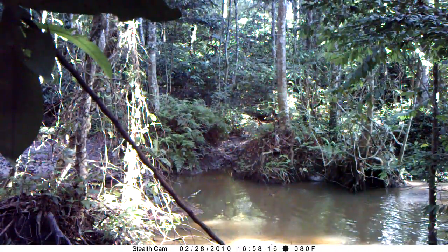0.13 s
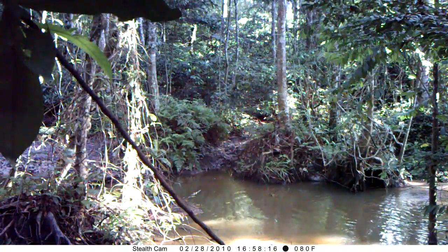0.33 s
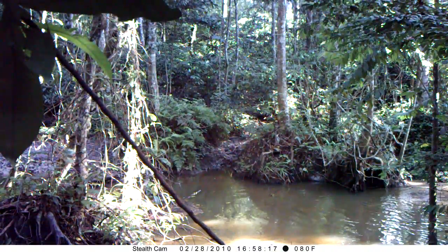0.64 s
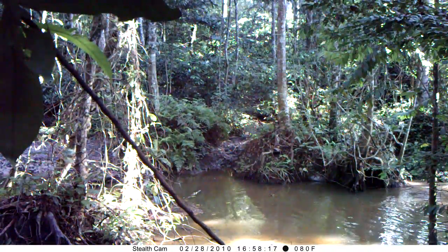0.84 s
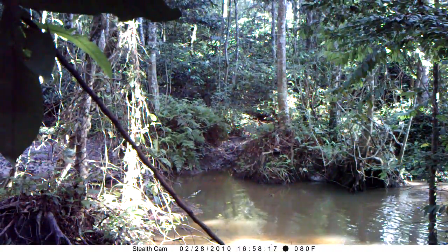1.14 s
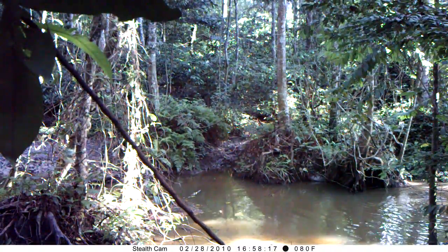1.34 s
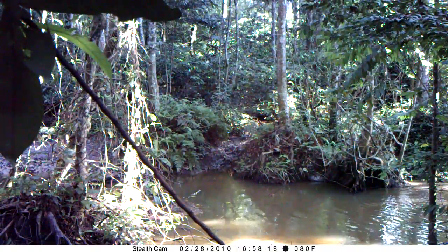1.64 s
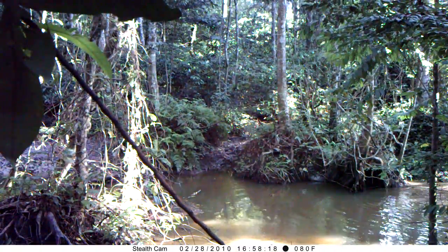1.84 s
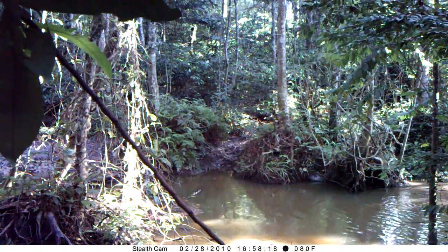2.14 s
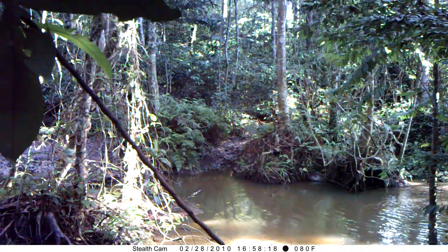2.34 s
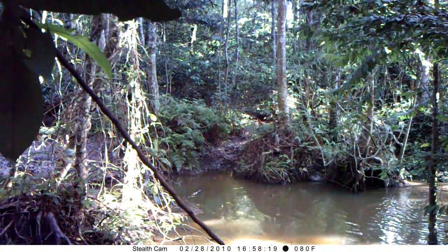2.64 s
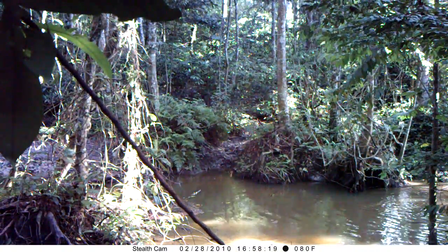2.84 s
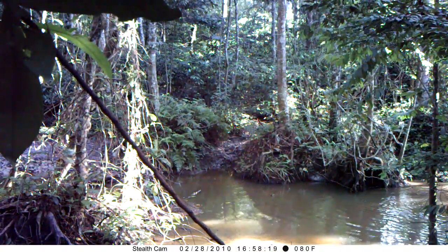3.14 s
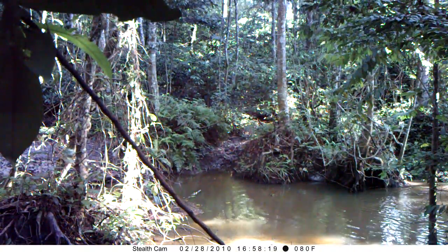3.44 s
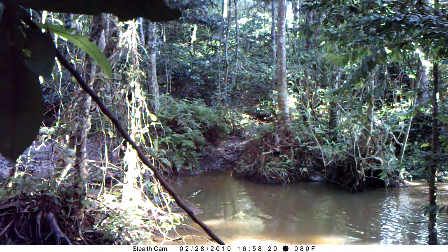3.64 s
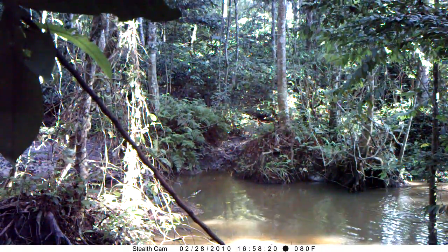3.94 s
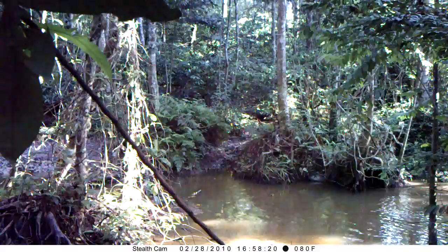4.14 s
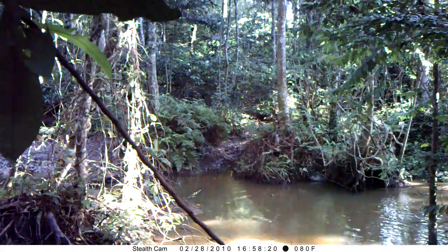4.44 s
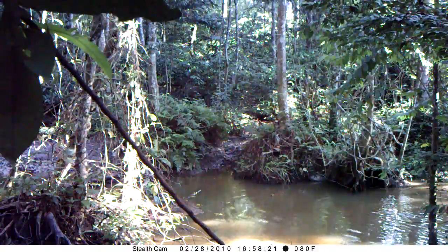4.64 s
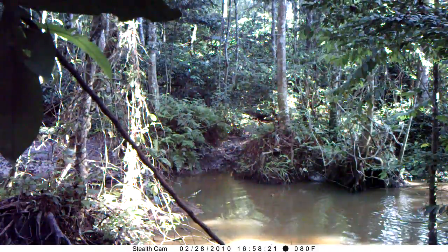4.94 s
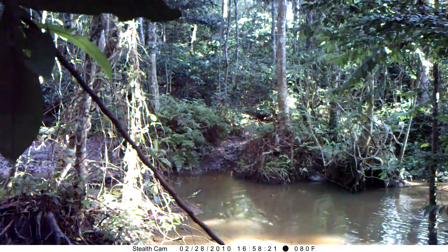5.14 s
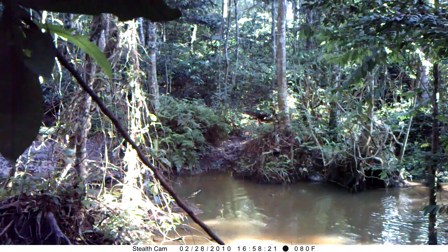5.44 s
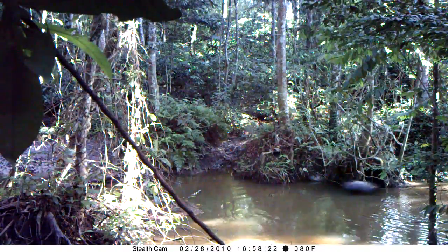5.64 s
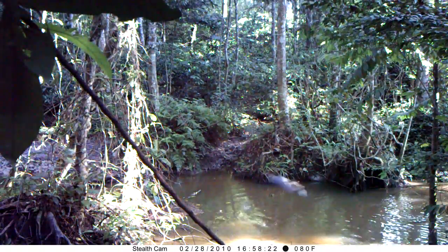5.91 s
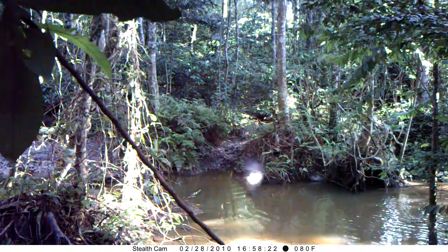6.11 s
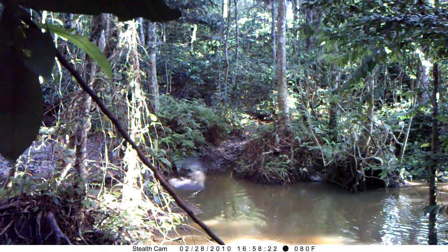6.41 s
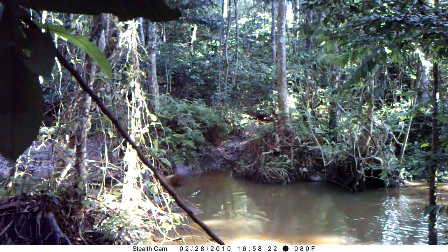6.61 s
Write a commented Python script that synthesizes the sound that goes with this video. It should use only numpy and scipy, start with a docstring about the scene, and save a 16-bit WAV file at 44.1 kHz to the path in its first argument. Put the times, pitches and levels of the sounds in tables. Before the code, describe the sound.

Six braying, rasping honks from a big wading bird ring among trees by a quiet creek, with faint trills, insect hiss and sharp clicks.

```python
"""An ibis gives six loud, nasal cries by a forest creek; each arches in pitch and breaks into
half-pitch and rasp. Syrinx pulses sound through windpipe and throat; the forest echoes them.
Behind: creek and leafy hiss from filtered noise, an insect drone from a noise-modulated tone,
faint trills and whistles from gliding sines, dry clicks and a crackle from decaying snaps."""
import sys
import numpy as np
from scipy import signal
from scipy.fft import rfft, irfft, next_fast_len
from scipy.io import wavfile
from scipy.ndimage import uniform_filter1d, minimum_filter1d

SR = 44100
rng = np.random.default_rng(int(sys.argv[2]) if len(sys.argv) > 2 else 0)


def dump_mix(stems):
    """Bounce the given channels to the path in sys.argv[1] as a 16-bit WAV at rate SR."""
    frames = np.atleast_2d(stems).T  # one column per channel
    limited = np.clip(frames, -1, 1)  # hard clip at full scale
    pcm = np.round(limited * 32767).astype(np.int16)
    wavfile.write(sys.argv[1], SR, pcm)


N = 298557
TIME = np.arange(N) / SR


def amp(db):
    """Decibels to gain."""
    return 10 ** (np.asarray(db) / 20)


def unit(x):
    """Scales to rms 1."""
    return x / np.sqrt(np.mean(x ** 2) + 1e-20)


def steady(x, size=1300):
    """Holds the running rms at 1 over a window of size samples."""
    return x / np.sqrt(abs(uniform_filter1d(x ** 2, size)) + 1e-12)


def read(points, hz):
    """Interpolates a table on a log-frequency axis."""
    f, value = np.transpose(points)
    return np.interp(np.log(hz + 1), np.log(f + 1), value)


def add(mix, start_s, sound):
    """Mixes a sound in at start_s."""
    part = mix[max(round(start_s * SR), 0):][:len(sound)]
    part += sound[:len(part)]


def colour(x, points):
    """Filters by a spectrum of (f/Hz, gain/dB)."""
    size = next_fast_len(len(x) + 2048)
    gain = amp(read(points, np.fft.rfftfreq(size, 1 / SR)))
    return irfft(rfft(x, size) * gain, size)[:len(x)]


def wander(hz):
    """Random motion of rms 1: noise rolled off above hz."""
    size = next_fast_len(N)
    f = np.fft.rfftfreq(size, 1 / SR)
    spectrum = rfft(rng.standard_normal(size)) / np.sqrt(1 + (f / hz) ** 4)
    return unit(irfft(spectrum)[:N])


def lowpass(x, hz):
    """Steep band limit."""
    return signal.oaconvolve(x, signal.firwin(601, hz, window=("kaiser", 8), fs=SR), "same")


# creek and air, density per Hz: f/Hz, level/dB
CREEK_SPECTRUM = [(20, -7), (100, -8), (500, 3), (1000, 0.5), (1450, 11.5), (2000, 3), (3500, -3),
                  (5200, 1), (6500, -3), (8000, 1), (12000, -1.5)]


def creek(level_db=-53):
    """Wash of the creek: coloured noise with a slow random ripple in level."""
    wash = unit(colour(rng.standard_normal(N), CREEK_SPECTRUM))
    return amp(level_db) * wash * amp(0.7 * wander(4))


def insects(level_db=-59, centre_hz=10800):
    """High drone: a tone multiplied by slow noise is a band about centre_hz; its level flickers."""
    drone = unit(wander(660) * np.sin(2 * np.pi * centre_hz * TIME))
    return amp(level_db) * drone * amp(0.53 * wander(25))


def rustle(level_db=-46):
    """Bright leafy hiss: noise, strongest at the start, then held at about a third."""
    spectrum = [(100, -10), (1000, -0.5), (3300, 3.5), (5200, 5.5), (8000, 3.5), (12000, -3.5)]
    hiss = unit(colour(rng.standard_normal(N), spectrum))
    swell = np.interp(TIME, [0, 0.05, 0.09, 0.24, 0.4], [0.86, 1, 1, 1, 0.36])
    return amp(level_db) * hiss * swell * amp(1.5 * wander(40))


# ring time of the deep forest: f/Hz, t60/s
FOREST_T60 = [(400, 0.88), (1400, 0.83), (2800, 0.89), (5000, 0.96), (8000, 0.78), (12000, 0.86)]
# leaves and twigs scatter short waves most: f/Hz, gain/dB
SCATTER_SPECTRUM = [(500, -5.5), (1400, -1.5), (2300, -0.5), (3200, 3), (4500, 0), (10000, 6)]


def forest(x, near_db, far_db, near_t60_s=0.19, bloom_s=0.018):
    """Trunks and banks scatter the sound after 3 ms; the deep forest blooms and rings on."""
    t = np.arange(SR) / SR
    near, far = rng.standard_normal((2, SR)) * (rng.random((2, SR)) < 2500 / SR)
    # each band of the deep forest decays at its own rate
    hz, when, z = signal.stft(far * np.minimum(t / bloom_s, 1), SR, nperseg=256)
    decay = amp(-60 * when / read(FOREST_T60, hz)[:, None])
    far = signal.istft(z * decay, SR, nperseg=256)[1][:SR]
    near = near * amp(-60 * t / near_t60_s) * (t > 0.003)
    echoes = amp(near_db) * near / np.linalg.norm(near) + amp(far_db) * far / np.linalg.norm(far)
    return x + colour(signal.fftconvolve(x, echoes)[:N], SCATTER_SPECTRUM)


# trills, level ahead of the birds' gain and echo: t/s, length/s, level/dB
TRILL_ROWS = [(0.14, 0.087, -54.5), (1.146, 0.13, -55), (2.263, 0.12, -55), (3.38, 0.05, -55),
              (4.214, 0.077, -53), (5.538, 0.17, -57), (5.728, 0.094, -68), (5.863, 0.11, -55.5)]


def trills(drift, pitch_hz=2970, throb_hz=68):
    """A bird's trills: a drifting sine throbs in level and slightly in pitch."""
    out = np.zeros(N)
    for start_s, length_s, level_db in TRILL_ROWS:
        t = np.arange(0, length_s, 1 / SR)
        throb = np.sin(2 * np.pi * throb_hz * t)
        hz = pitch_hz * (1 + 0.0027 * throb + 0.015 * drift[:len(t)])
        tone = np.sin(2 * np.pi * np.cumsum(hz) / SR)
        swell = (1 + 0.5 * throb) * signal.windows.tukey(len(t), 0.5)
        add(out, start_s, amp(level_db) * unit(tone * swell))
    return out


# rising whistles, level ahead of the birds' gain and echo: t/s, length/s, start f/Hz, end f/Hz, level/dB
WHISTLE_ROWS = [(2.208, 0.31, 5510, 5720, -62), (5.353, 0.19, 5560, 5740, -64),
                (5.662, 0.45, 5650, 5720, -63)]


def whistles(drift):
    """Thin rising whistles: a sine glides up, slowing at the top, under a half-sine swell."""
    out = np.zeros(N)
    for start_s, length_s, start_hz, end_hz, level_db in WHISTLE_ROWS:
        u = np.arange(0, length_s, 1 / SR) / length_s
        glide_hz = start_hz + (end_hz - start_hz) * np.sin(np.pi * u / 2)
        turns = np.cumsum(glide_hz * (1 + 0.0046 * drift[:len(u)])) / SR
        add(out, start_s, amp(level_db) * unit(np.sin(2 * np.pi * turns) * np.sin(np.pi * u)))
    return out


def small_birds(gain_db=2.0):
    """Faint trills and whistles with the echo of the forest."""
    drift = wander(93)
    return amp(gain_db) * forest(trills(drift) + whistles(drift), near_db=-8, far_db=-10)


# dry clicks: t/s, level/dB
CLICK_ROWS = [(.054, -37), (3.797, -27), (4.757, -18.5), (6.105, -12.5), (6.150, -21), (6.185, -18),
              (6.428, -22)]
# crackle in the last cry, snap heights random about the level: t/s, length/s, level/dB
CRACKLE_RUN = (6.34, .1, -22)
CRACKLES_PER_S = 170


def clicks(decay_s=0.00005):
    """Very short decaying snaps of broad band, single or in a ragged run."""
    out, snap = np.zeros(N), np.exp(-TIME[:64] / decay_s)
    for start_s, level_db in CLICK_ROWS:
        add(out, start_s, amp(level_db) * snap)
    run_s, length_s, level_db = CRACKLE_RUN
    for start_s in run_s + length_s * rng.random(round(CRACKLES_PER_S * length_s)):
        add(out, start_s, amp(level_db) * rng.standard_normal() * snap)
    return out


def held(rows, t):
    """Sums the value columns of (t/s, length/s, values..) rows, each eased in and out."""
    start, length, *values = np.transpose(rows)
    inside = np.minimum(t[:, None] - start, start + length - t[:, None])
    ease = 0.5 + 0.5 * np.sin(np.pi * np.clip(inside / SLIP_S, -0.5, 0.5))
    return np.array(values) @ ease.T


# slips to a lower note, held: t/s, length/s, drop f/Hz, effort change level/dB, treble change level/dB
SLIP_ROWS = [(.365, 0.068, 42, 3, -.5), (.55, 0.097, 39.7, 1.5, 4), (1.465, 0.22, 48, 3, -0.5),
             (1.70, 0.16, 86, 1, -0.5), (2.72, .18, 7.7, -1.5, -3.5), (2.90, 0.16, 84.3, 2.5, -3.5),
             (3.05, 0.085, 37.7, 2.5, 0.5), (3.61, .06, 65, 2, 2.5), (3.705, 0.039, 22.4, -0.5, -5.5),
             (4.555, 0.072, 72, 1.5, 2), (4.655, .045, 32.7, 0.5, 0.5), (4.79, 0.23, 92, -0.27, 2),
             (6.215, .105, 57, -1, 6.5), (6.32, .2, 24.7, -2, 3)]
# voice breaks or clears: t/s, length/s, period doubling/0-1, added rasp (negative clears)
BREAK_ROWS = [(.29, 0.31, 0.43, .35), (1.34, 0.048, 0.57, 0), (1.46, 0.0513, 0, 0.49),
              (1.495, 0.193, 0.85, 0.33), (2.66, 0.084, 0.84, 0.6), (2.96, 0.071, 0.47, 0.41),
              (3.53, 0.27, 0.2, 0.07), (4.47, 0.058, 0.45, 0.38), (4.83, 0.149, 0, -.1),
              (6.06, 0.066, 0.58, 0.04), (6.30, 0.11, 0.62, 0.04)]
SLIP_S = 0.0427  # passage between notes or voice states
SCOOP_HZ, SAG_HZ_PER_S = 202.7, 40  # scoop from below the top pitch, then slow sag
END_HZ, DROP_HZ_PER_S = 341.5, 1900  # plunge as the air gives out
WOBBLE = 0.008  # rms, of pitch
DIP_DB, DIP_S = -0.5, 0.085  # slight dip of effort and treble after the scoop
EFFORT_DB_PER_HZ, TREBLE_DB_PER_HZ = 0.0529, 0.04  # a lower note is softer and duller
RASP_HELD, RASP_EDGE, RASP_SLIP, RASP_TREBLE_DB = 0.15, 0.85, 0.55, 3  # rasp brightens
RASP_START_S, RASP_END_S, EDGE_DOUBLING = 0.0618, 0.073, 0.6  # unsettled at either end
RELEASE_S, RELEASE_DB = 0.027, -19.5


def gesture(t, scoop_s, top_hz, top_db, tiring_db_per_s, bright_db):
    """Pitch scoops, slips and plunges; effort and treble follow; unsettled voice rasps."""
    age, left = t - t[0], t[-1] - t
    drop_hz, push_db, shine_db = held(SLIP_ROWS, t)
    doubling, added_rasp = held(BREAK_ROWS, t)
    scoop_hz = SCOOP_HZ * np.maximum(1 - age / scoop_s, 0) ** 2
    hz = top_hz - scoop_hz - SAG_HZ_PER_S * age - drop_hz
    hz = np.minimum(hz, END_HZ + DROP_HZ_PER_S * left)
    hz = hz * (1 + WOBBLE * wander(13.93)[:len(t)])
    dip_db = DIP_DB * np.exp(-((age - 1.57 * scoop_s) / DIP_S) ** 2)
    edges = np.exp(-(age / RASP_START_S) ** 2) + np.exp(-(left / RASP_END_S) ** 2)
    slipping = np.tanh(abs(np.gradient(drop_hz, t)) / 1000)
    rasp = np.clip(RASP_HELD + RASP_EDGE * edges + RASP_SLIP * slipping + added_rasp, 0, 1)
    effort_db = top_db - tiring_db_per_s * age + dip_db + push_db
    effort_db = effort_db + EFFORT_DB_PER_HZ * (hz - top_hz)
    effort_db = effort_db + RELEASE_DB * np.maximum(1 - left / RELEASE_S, 0)
    treble_db = bright_db + shine_db + dip_db + RASP_TREBLE_DB * rasp
    treble_db = treble_db + TREBLE_DB_PER_HZ * (hz - top_hz)
    return hz, effort_db, treble_db, rasp, np.clip(doubling + EDGE_DOUBLING * edges, 0, 1)


def windpipe(hz, lowest_hz=291, reflection=0.42):
    """Pipe shut at the syrinx, open at the bill: rings at odd multiples of lowest_hz."""
    return 1 / abs(1 + reflection * np.exp(-1j * np.pi * hz / lowest_hz))


# response of throat and bill: f/Hz, level/dB
THROAT_SPECTRUM = [(300, -27), (520, -13.5), (720, -16.5), (870, -23), (1050, -3.5), (1320, 8.5), (1700, 6),
                   (2100, 2), (2650, 2), (3200, -1.5), (3750, -3), (4450, 1.5), (5500, -1.5), (7500, -11.5),
                   (11800, -29)]
NASAL_HZ, NASAL_WIDTH_HZ = 2210, 89  # narrow ring, makes some cries more nasal
BRASS_DB, BRASS_HARMONIC, BRASS_WIDTH = 4.5, 10.7, 0.96  # partials the syrinx stresses
TREBLE_LAG_S = 0.057  # treble opens late


def cry(start_s, length_s, attack_s, scoop_s, top_hz, top_db, tiring_db_per_s, bright_db,
        lowering_hz, nasal_db, smear=0.07, hiss_db=-4, hiss_hz=3900, open_hz=430):
    """Uneven syrinx pulses, paired when the voice breaks, sound through windpipe and throat."""
    t = start_s + np.arange(0, length_s, 1 / SR)
    age = t - start_s
    hz, effort_db, treble_db, rasp, doubling = gesture(
        t, scoop_s, top_hz, top_db, tiring_db_per_s, bright_db)
    # timing jitter smears high harmonics, leaves low ones clean
    jitter = 0.004 * wander(40)[:len(t)] + 0.028 * rasp ** 1.5 * wander(90)[:len(t)]
    turns = np.cumsum(hz * (1 + jitter)) / SR
    # bill half shut at low pitch: the first resonance scoops with the third harmonic
    shift_hz = 3 * np.maximum(open_hz - hz, 0) + lowering_hz
    # odd half-steps sound when every second pulse differs
    pairing = 0.65 * doubling ** 1.5
    flutter_db = 3.3 * wander(22)
    grid = np.arange(0, SR / 2, 10)
    nasal = np.exp(-((grid - NASAL_HZ) / NASAL_WIDTH_HZ) ** 2)
    throat = amp(read(THROAT_SPECTRUM, grid) + nasal_db * nasal)
    pipe = windpipe(grid)
    step = np.exp(1j * np.pi * turns)
    line, voice = step, np.zeros(len(t))
    for k, place in enumerate(rng.random(58), 2):
        line = line * step
        partial_hz = k * hz / 2
        gain = np.interp(partial_hz + shift_hz * (k > 3), grid, throat)
        gain = gain * np.interp(partial_hz, grid, pipe)
        gain = gain * amp(BRASS_DB * np.exp(-((k / 2 - BRASS_HARMONIC) / BRASS_WIDTH) ** 2))
        # each partial swells and sinks on its own
        gain = gain * amp(flutter_db[int(place * (N - SR)):][:len(t)])
        # phase growing as k squared spreads each pulse over its cycle
        spread = (line * np.exp(-1j * smear * k ** 2)).real
        voice += gain * spread * (pairing if k % 2 else 1)
    low = signal.sosfiltfilt(signal.butter(8, 3700, fs=SR, output="sos"), voice)
    # air torn by each pulse hisses in the upper resonances
    puffs = (2 + np.cos(2 * np.pi * turns)) * rng.standard_normal(N)[:len(t)]
    hiss_gain_db = 20 * np.log10(throat / (1 + (hiss_hz / (grid + 1)) ** 10))
    hiss = colour(puffs, np.transpose([grid, hiss_gain_db]))
    high = unit(voice - low) + amp(hiss_db) * np.sqrt(rasp) * unit(hiss)
    # pressing harder shifts power upwards
    treble = amp(treble_db) * np.minimum(age / TREBLE_LAG_S, 1)
    voice = (steady(low) + treble * steady(high)) / np.sqrt(1 + treble ** 2)
    fade = np.minimum(age / attack_s, 1) * np.minimum((t[-1] - t) / 0.011, 1)
    return start_s, amp(effort_db) * voice * fade


# cries, base values that the gesture then bends: t/s, length/s, attack/s, scoop/s, top f/Hz,
# effort level/dB, tiring/(dB/s), treble over low band level/dB, throat lowering f/Hz, nasal ring level/dB
CRY_ROWS = [(0.229, 0.58, 0.017, 0.099, 544, -25.5, -3.5, 0.8, 64, 2),
            (1.206, 0.74, 0.021, 0.13, 538.7, -22.5, -1, 2, 43, 0),
            (2.508, 0.66, 0.017, 0.11, 539.2, -18.5, 5, 3.5, 9, 1.5),
            (3.453, 0.45, 0.046, .105, 534.1, -18, -2.5, 4.5, 11, 2.5),
            (4.321, 0.69, 0.028, .12, 527.9, -18, -6.5, 0.4, 1, -0.5),
            (5.978, 0.51, 0.05, 0.14, 518.4, -13, -4.5, 0.6, 103, 2)]


def ibis():
    """Six cries and their forest echo."""
    out = np.zeros(N)
    for row in CRY_ROWS:
        add(out, *cry(*row))
    return forest(out, near_db=-6, far_db=-4.5)


EDGE_HZ, TOP_HZ = 12000, 15860  # band limits: all but the clicks; whole mix


def scene():
    """Sums all sources to mono; all but the clicks lose the top treble."""
    birds = ibis() + small_birds()
    background = creek() + insects() + rustle()
    mono = lowpass(birds + background, EDGE_HZ) + clicks()
    return np.array([mono, mono])


def record(dry):
    """A fast limiter holds down the loudest peaks; then the band limit."""
    ceiling, size = 0.76, 65  # full scale; samples
    gain = np.minimum(1, ceiling / (abs(dry).max(0) + 1e-9))
    gain = uniform_filter1d(minimum_filter1d(gain, size), size)
    return np.array([lowpass(x * gain, TOP_HZ) for x in dry])


dry = scene()
out = record(dry)
dump_mix(out)
```